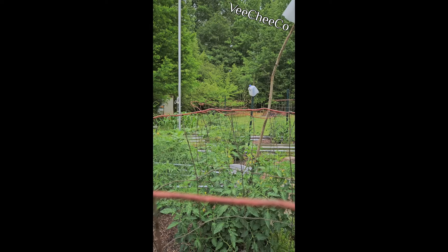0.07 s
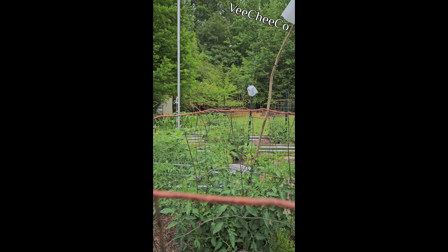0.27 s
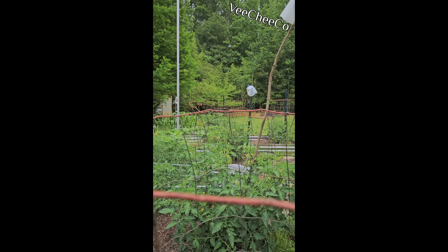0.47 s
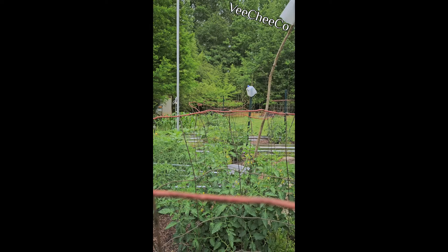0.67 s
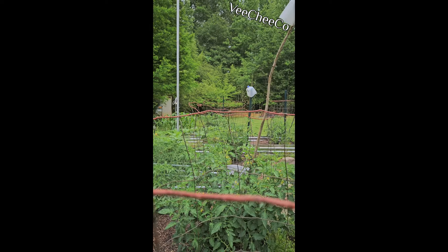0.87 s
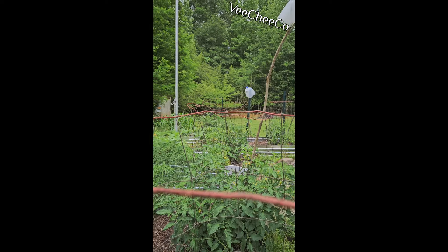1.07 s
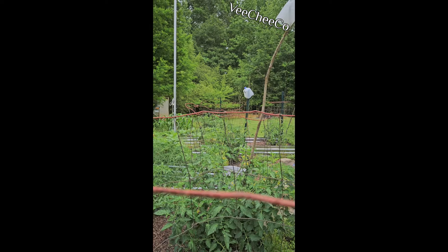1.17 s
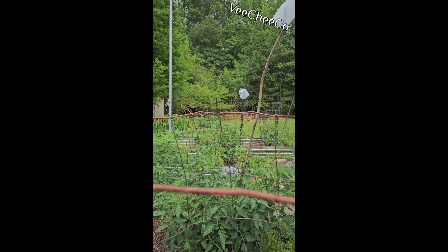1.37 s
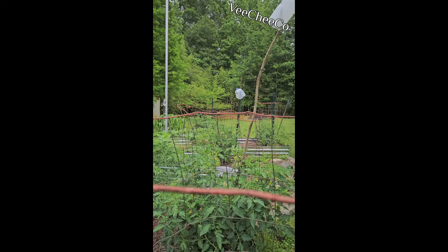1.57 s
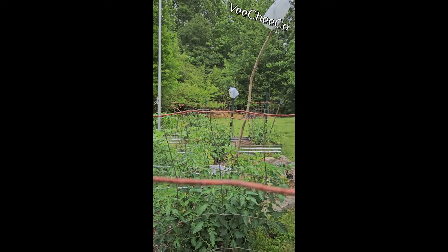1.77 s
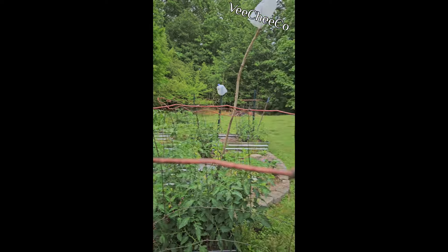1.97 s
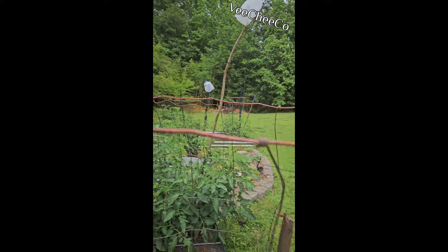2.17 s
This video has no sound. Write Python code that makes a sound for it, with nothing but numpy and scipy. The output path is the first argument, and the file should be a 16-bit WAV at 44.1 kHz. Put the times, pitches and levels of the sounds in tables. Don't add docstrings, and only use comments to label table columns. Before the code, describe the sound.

Impact sprinkler starting up in a garden: valve clack, water spit, then fast metallic spray-chopping ticks

```python
import sys
import numpy as np
from scipy import signal
from scipy.fft import rfft, irfft
from scipy.io import wavfile

SR = 44100
rng = np.random.default_rng(int(sys.argv[2]) if len(sys.argv) > 2 else 0)


def put_to_file(sound):
    columns = np.atleast_2d(sound).T
    safe = np.clip(columns, -1, 1)
    whole_steps = np.round(safe * 32767)
    wavfile.write(sys.argv[1], SR, whole_steps.astype(np.int16))


def magnitude_from_level(level_db):
    exponent = np.asarray(level_db, float) / 20
    return 10 ** exponent


N = 97813
T = np.arange(N) / SR
F = np.maximum(np.fft.rfftfreq(N, 1 / SR), 1)
FADE = np.clip((T[-1] - T) / 0.006, 0, 1)
CLACK_AT_S, CLACK_DB = 0.7338, -22.5

# start_s, level_db, knock_against_splash_db
ARM_STRIKES = [(0.8767, -19.5, -1), (0.9815, -18.5, -2), (1.088, -19, 1), (1.194, -18, -0.5),
               (1.3006, -19.5, 0.), (1.4068, -17, 0.), (1.5133, -14, -1.5), (1.6196, -17.5, 1),
               (1.726, -15.5, 0.5), (1.8323, -15, -1.5), (1.9391, -16.5, 0.), (2.0455, -14.5, -2),
               (2.152, -18.5, 2.5)]
# mode_hz, level_db, t60_s, lag_s
HEAD_MODES = [(461, -11, 0.029, 0.0029), (872, -7, 0.022, 0.0012), (1380, -6, 0.018, .002),
              (1980, -6.5, 0.018, .001), (2342, -0.5, 0.012, 0.002), (2737, 1.4, 0.016, 0.001),
              (3450, -5.5, 0.014, 0.0044), (4800, -2.5, .012, 0.0032), (5380, -11, 0.015, 0.0033),
              (7000, 0.9, 0.011, 0.00072), (7870, -2, 0.0065, 0.), (8400, -5, 0.0027, 0.),
              (11830, 10.5, 0.0073, 0.00093), (12600, -2, 0.0061, .0003)]
# frequency_hz, drift_db_per_s
HEAD_TURN = [(1500, -1), (2350, 7.5), (2750, -5), (4750, -16), (7000, 4), (12500, 0.)]
# mode_hz, level_db, t60_s, lag_s
VALVE_MODES = [(494, -12, .02, 0.004), (880, -0.5, 0.018, 0.005), (1194, -6, 0.026, 0.),
               (1473, 2, 0.018, 0.00078), (1790, -7, 0.0098, 0.), (2110, -1.5, 0.014, 0.00031),
               (2940, -4.5, 0.017, 0.0042), (3830, -15, 0.012, 0.012), (4800, -10, 0.0092, 0.016)]
# frequency_hz, density_db_per_hz
SPLASH_COLOUR = [(300, -32), (1200, -22), (2800, -12), (4000, -6), (5700, -5), (8090, 1), (12100, 2),
                 (16000, -6)]
# start_s, level_db
JET_DROPS = [
    (.4094, -57),
    (1.6656, -39),
    (1.774, -35),
    (2.011, -31),
    (2.0244, -34),
    (2.104, -34),
    (2.127, -34),
    (2.185, -31),
]
# time_s, level_db
JET_STRENGTH = [
    (0.75, -58),
    (0.802, -61),
    (0.914, -54),
    (0.96, -53.5),
    (1.08, -56),
    (1.372, -55),
    (1.726, -55.5),
    (2.2, -50.5),
]
# frequency_hz, density_db_per_hz
JET_SPECTRUM = [(250, -12), (420, -6), (701, -17.5), (1030, -11), (3400, -8), (6000, -7), (12300, 2),
                (16000, -11)]
# peak_s, level_db, rise_s, fall_s
WATER_GUSHES = [
    (.766, -50.5, .0006, 0.0096),
    (.776, -42, .005, 0.01),
    (2.02, -48.5, 0.018, 0.044),
    (2.167, -36, .022, 0.017),
]
# start_s, length_s, pitch_hz, level_db, opening_slide_share_of_pitch
WHISTLED_NOTES = [
    (.188, 0.12, 2196, -63, -0.018),
    (.278, 0.096, 1777, -66.5, 0.25),
    (.35, .066, 2180, -75, .002),
    (.418, 0.11, 3010, -63.5, -.24),
    (.524, 0.13, 2490, -60.5, 0.088),
    (.66, 0.067, 2490, -74, 0.0088),
]
# start_s, length_s, pitch_hz, level_db
BUZZ_CALLS = [
    (0.024, 0.075, 7880, -58),
    (0.499, 0.067, 7880, -57.5),
]
# frequency_hz, density_db_per_hz
LEAF_COLOUR = [(20, -14), (105, -5.5), (161, -7), (1100, -20), (4500, -19.5), (8360, -16), (11000, -25),
               (16000, -30.5)]
# time_s, level_db
LEAF_SWELL = [
    (0., 6),
    (.15, 3.5),
    (.4, 2),
    (.7, 0.9),
    (1., 9.6),
    (2.22, 8.1),
]
# frequency_hz, share_of_swell
SWELL_SHARE = [(300, 0.9), (3000, 1.4), (12000, 1.17)]
# centre_hz, width_hz, level_db
TRAFFIC_HUM = [
    (66.6, 24.5, -69),
    (110, 22, -66.5),
]
# frequency_hz, level_db, extra_lag_rad
LEFT_SHADOW = [(302, -1.04, 0.22), (590, -3.5, 0.24), (1040, -3.5, 0.08), (1500, -1, 0.72),
               (2530, -6.5, -0.21), (5860, -5.5, 0.6), (9000, -7, -0.2), (11900, -14.5, 1.08)]
# centre_hz, width_hz, level_db
MIC_DIPS = [(7540, 2600, -2.5), (10074, 684, -11.5), (12700, 2700, -1), (5910, 550, -5.5)]


def level(x, db):
    return x * magnitude_from_level(db) / np.sqrt(np.mean(x ** 2))


def curve(table, x):
    return np.interp(x, *np.array(table, float).T[:2])


def colour(x, table):
    hz, db = np.array(table, float).T
    return irfft(rfft(x) * magnitude_from_level(np.interp(np.log(F), np.log(hz), db)), N)


def band(x, hz, width):
    return irfft(rfft(x) * np.exp(-0.5 * ((F - hz) / width) ** 2), N)


def noise(*shape):
    return rng.standard_normal(shape + (N,))


def walk(rate_hz):
    return level(band(noise(), 0, rate_hz), 0)


def burst(at, rise, fall):
    return np.exp(np.where(T < at, (T - at) / rise, (at - T) / fall))


def ring(at, modes, turned=0, soft=0.84):
    hz, db, t60, lag = np.array(modes, float).T[:, :, None]
    detune, strength, port_phase = rng.standard_normal((3, len(hz), 1))
    start = int(at * SR)
    t = np.maximum(T[start:start + SR // 16] - at - lag, 0)
    db = db + turned * curve(HEAD_TURN, hz)
    hz = hz * (1 - 0.015 * turned + 0.008 * detune)
    decay = magnitude_from_level(db + 1.3 * strength - 60 * t / t60)
    onset = 1 - np.exp(-t * hz / soft)
    out = np.zeros((2, N))
    for port in range(2):
        phase = (1 - port) * port_phase * hz / 9800
        modes_sum = (decay * onset / 3 * np.sin(2 * np.pi * hz * t + phase)).sum(axis=0)
        out[port, start:start + t.shape[1]] = modes_sum
    return out


def echo(x, t60, first_s=0.0123):
    tail = noise(2) * magnitude_from_level(-60 * T / t60) * (T > first_s)
    tail = tail / np.sqrt((tail ** 2).sum(axis=1, keepdims=True))
    return signal.fftconvolve(x[None], tail[:, :SR], axes=1)[:, :N]


def arm_knocks():
    return sum(magnitude_from_level(db + knock_db - 2.5) * ring(at, HEAD_MODES, at - 1.5)
               for at, db, knock_db in ARM_STRIKES)


def valve_clack():
    rebound = ring(CLACK_AT_S + 0.0325, VALVE_MODES, soft=0.34)
    return magnitude_from_level(CLACK_DB) * (ring(CLACK_AT_S, VALVE_MODES, soft=0.65) + magnitude_from_level(-16) * rebound)


def spray_bursts(grain):
    enter_s = 0.0024
    swell = 0
    for at, db, _ in ARM_STRIKES:
        top = at + 0.000595
        crack = magnitude_from_level(-7) * burst(top, 0.0004, 0.0008)
        splash = magnitude_from_level(-12.5) * burst(top, enter_s, 0.0064)
        mist = magnitude_from_level(-27) * burst(top, 3 * enter_s, 0.018)
        swell = swell + magnitude_from_level(db) * (crack + splash + mist)
    swell = swell + magnitude_from_level(CLACK_DB - 10) * burst(CLACK_AT_S + 0.00074, 0.00037, 0.003)
    swell = swell + sum(magnitude_from_level(db) * burst(at + 0.0004, 0.0002, 0.0004) for at, db in JET_DROPS)
    return swell * grain * level(colour(noise(2), SPLASH_COLOUR), 0)


def water_jet():
    falls = rng.random((2, N)) < 1600 / SR
    size = magnitude_from_level(1.5 * np.minimum(rng.exponential(size=(2, N)), 3.5))
    drops = signal.lfilter([1], [1, -0.3, 0.4], falls * size * np.sign(noise(2)))
    jet = level(colour(noise(2) + level(drops, -7.5), JET_SPECTRUM), 0)
    opening = np.clip((T - CLACK_AT_S) / 0.0053, 0, 1)
    flow = magnitude_from_level(curve(JET_STRENGTH, T) + 5 + 3 * walk(36)) * opening
    flow = flow + sum(magnitude_from_level(db) * burst(at, rise, fall) for at, db, rise, fall in WATER_GUSHES)
    return flow * jet


def leaf_patter(grain):
    arrival = np.clip((T - 1.824) / 0.22, 0, 1)
    return level(band(noise(2), 3460, 740), -53) * grain * arrival


def sprinkler():
    grain = magnitude_from_level(3.14 * walk(320))
    water = spray_bursts(grain) + FADE * (water_jet() + leaf_patter(grain))
    return arm_knocks() + valve_clack(), water


def whistle():
    rise_slide_s, fall_slide_s = 0.003, 0.011
    out = 0
    for at, length, hz, db, slide in WHISTLED_NOTES:
        t = T - at
        slide_s = fall_slide_s if slide > 0 else rise_slide_s
        glide = slide * np.exp(-np.maximum(t, 0) / slide_s)
        pitch = hz * (1 + glide + 0.0016 * walk(34))
        edges = np.clip(np.minimum(t + rise_slide_s, length - t) / 0.009, 0, 1)
        loudness = magnitude_from_level(db - 1 - 8 * np.clip(t, 0, 1) + 1.2 * walk(25))
        out = out + edges * loudness * np.sin(2 * np.pi * np.cumsum(pitch) / SR)
    return out


def buzz():
    trill_hz, depth = 41.4, 0.45
    out = 0
    for at, length, hz, db in BUZZ_CALLS:
        t = T - at
        turn = 2 * np.pi * trill_hz * t
        pitch = hz - 178 * np.cos(turn / 3) + 148 * walk(240)
        trill = 1 - depth + depth * np.cos(turn - 1.2)
        tone = 2.05 * trill * np.sin(2 * np.pi * np.cumsum(pitch) / SR)
        air = level(band(noise(), hz + 450, 560), -4)
        edges = np.clip(np.minimum(t / 0.01, (length - t) / 0.041), 0, 1)
        out = out + magnitude_from_level(db) * edges * (tone + air)
    return out


def leaf_hiss():
    mid, side = noise(2)
    side = irfft(rfft(side) * np.minimum(F / 540, 1) ** 1.7, N)
    bed = level(colour(np.array([mid + side, mid - side]), LEAF_COLOUR), -65)
    log_hz = np.log(np.array(SWELL_SHARE)[:, 0])
    out = 0
    for weights, (_, share) in zip(np.eye(len(SWELL_SHARE)), SWELL_SHARE):
        part = irfft(rfft(bed) * np.interp(np.log(F), log_hz, weights), N)
        out = out + part * magnitude_from_level(share * curve(LEAF_SWELL, T) + 0.63 * walk(24))
    return out


def far_traffic():
    return sum(level(band(noise(), hz, width), db) * magnitude_from_level(0.88 * walk(2.5))
               for hz, width, db in TRAFFIC_HUM)


def ports(left, right):
    hz, _, lag = np.array(LEFT_SHADOW).T
    phase = 2 * np.pi * F * 0.0001305 + np.interp(F, hz, lag)
    late = irfft(rfft(left) * np.exp(-1j * phase), N)
    return np.array([colour(late, np.array(LEFT_SHADOW)[:, :2]), right])


def scene():
    knock, water = sprinkler()
    near = knock + water[0]
    near = near + magnitude_from_level(-11) * echo(near[1], 0.04, 0.003)
    sprinkling = ports(near[0] + magnitude_from_level(-1) * water[1], near[1])
    song, call = whistle(), buzz()
    trees = magnitude_from_level(-9.5) * echo(song, 0.8) + echo(call, 0.61)
    birds = song * magnitude_from_level([[-1.5], [1.5]]) + call * magnitude_from_level([[-1.6], [1.6]])
    background = ports(*(leaf_hiss() + far_traffic()))
    return magnitude_from_level(3.5) * sprinkling + birds + magnitude_from_level(6) * ports(*trees) + magnitude_from_level(1.5) * background


def top_cut(x):
    return signal.sosfilt(signal.butter(12, 16990, fs=SR, output="sos"), x)


def record(dry):
    db = sum(gain_db * np.exp(-0.5 * ((F - hz) / width) ** 2) for hz, width, gain_db in MIC_DIPS)
    db = db - 42 * np.clip((F - 15750) / 200, 0, 1) ** 2
    mix = irfft(rfft(dry * FADE) * magnitude_from_level(db), N)
    return top_cut(mix)


dry = scene()
out = record(dry)
put_to_file(out)
```